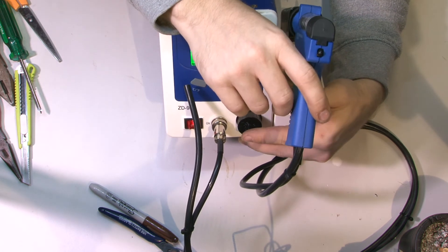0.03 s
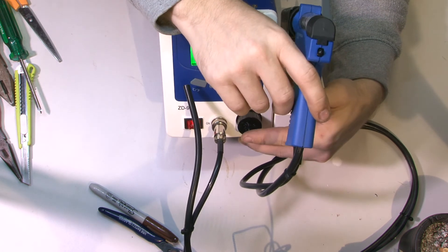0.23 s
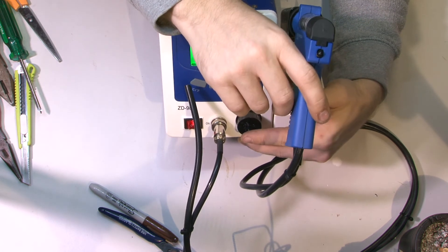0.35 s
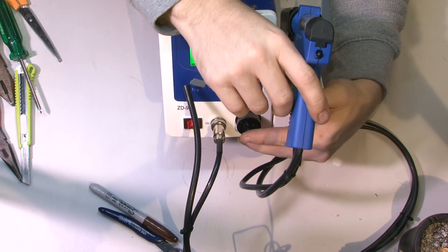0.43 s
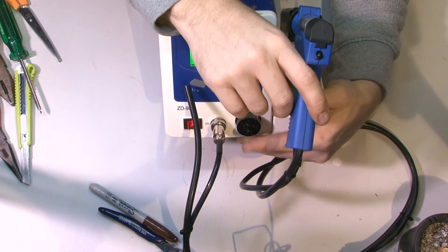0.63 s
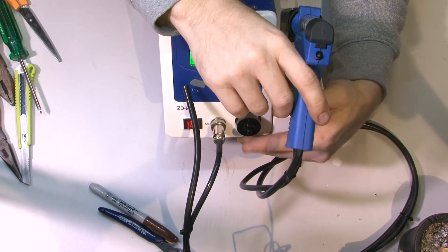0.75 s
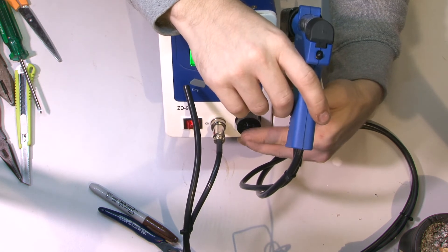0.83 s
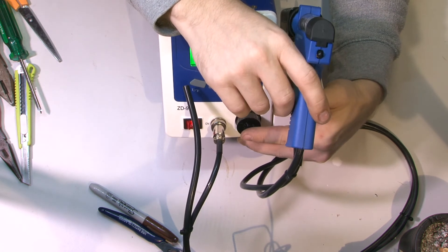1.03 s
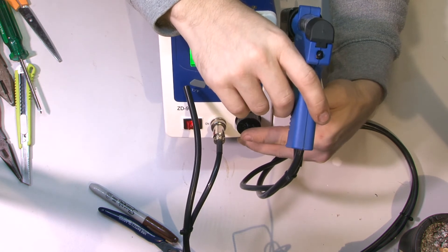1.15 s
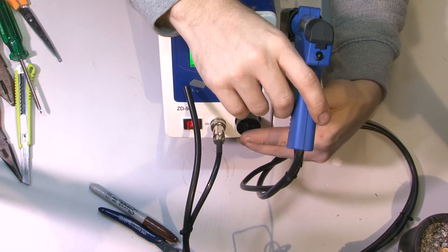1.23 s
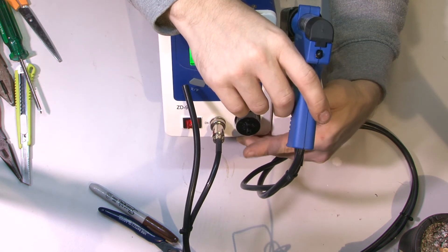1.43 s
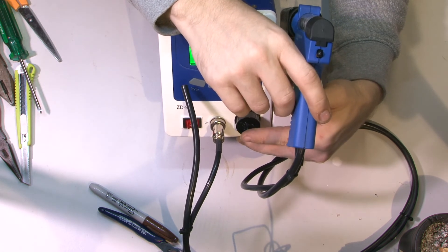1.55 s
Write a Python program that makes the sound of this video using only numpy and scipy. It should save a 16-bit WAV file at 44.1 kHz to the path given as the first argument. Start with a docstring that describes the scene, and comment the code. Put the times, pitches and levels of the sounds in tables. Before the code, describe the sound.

A small vacuum pump buzzes twice at a workbench. Each time, a desoldering gun's trigger clicks, the pump whirs up with a rattle and puffing air, then knocks to a stop. A small room hums faintly behind.

```python
"""The trigger of a desoldering gun clicks on, and a small vacuum pump in the bench unit spins up.
Its case hums at harmonics of the shaft; each turn thuds in the housing, rattles the panels, slaps a
valve and puffs air. The trigger clicks off, the pump coasts down, and the piston rocks to a stop with
a few knocks as the trigger clicks home. Then a second pull runs the same course.
Throughout, a small workroom reverberates and drones underneath."""
import sys
import numpy as np
from scipy import signal
from scipy.fft import rfft, irfft, next_fast_len
from scipy.io import wavfile
from scipy.ndimage import map_coordinates

SR = 44100
rng = np.random.default_rng(int(sys.argv[2]) if len(sys.argv) > 2 else 0)


def generate_wav(signal):
    """Clip the signal to [-1, 1] and save it as 16-bit WAV at the path in sys.argv[1]."""
    frames = np.transpose(np.atleast_2d(signal))
    scaled = np.clip(frames, -1, 1) * 32767
    pcm = np.round(scaled).astype(np.int16)
    wavfile.write(sys.argv[1], SR, pcm)


N = 70560
T = np.arange(N) / SR
TAIL = np.arange(SR // 3) / SR  # time axis of one decay


# shaft speed, one list per run (time [s], speed [turns/s])
RUN_SPEEDS = [
    [(.229, 39), (.25, 54.8), (.28, 70.3), (.31, 81.2), (.34, 86), (.38, 85.3), (.41, 83), (.45, 56),
     (.5, 27)],
    [(1.0425, 42), (1.06, 52.4), (1.088, 64.4), (1.112, 72), (1.146, 75.6), (1.165, 84), (1.2, 65.4),
     (1.236, 39.8), (1.27, 34)],
]
# envelopes, one list per run (time [s], hum [dB], thuds [dB], rattle [dB], valve [dB], air [dB])
RUN_ENVELOPES = [
    [(0.225, -12.5, -24.5, -20, -23, -41.5), (0.253, -8.5, -9, -13.5, -13.5, -29),
     (0.279, -10, -14, -19.5, -21.5, -32.5), (0.335, -12.5, -23, -21, -27.5, -42),
     (0.383, -9, -11, -19.5, -23.5, -28.5), (0.419, -23.5, -13, -33, -28.5, -37.5),
     (0.475, -31, -18, -26, -35.5, -57), (0.489, -40, -22, -43, -33, -56), (0.5, -37, -20, -35, -33, -55)],
    [(1.04, -3, -12, -17.5, -20.5, -43), (1.068, -9.5, -9.5, -18, -16, -28.5),
     (1.11, -9.5, -11, -22.5, -28, -37), (1.138, -12.5, -27, -24.5, -25.5, -43),
     (1.154, -17, -23, -20, -25, -35.5), (1.234, -26, -13.5, -35, -44.5, -56),
     (1.244, -22, -20, -35, -38, -66), (1.266, -21, -17, -35, -52, -64), (1.27, -18, -14, -23, -37, -59)],
]
def pump(speeds, envelopes):
    """Periodic forcing: one shaft drives every sound of a run, so pitch and stroke rate move together."""
    times, rates = np.transpose(speeds)
    start, stop = times[0], times[-1]
    speed = np.interp(T, times, rates)
    turns = np.cumsum(speed * (T > start)) / SR
    running = np.interp(T, [start - .003, start + .0016, stop - .01, stop + .0088], [0, 1, 1, 0])
    when, *columns = np.transpose(envelopes)
    hum_gain, thud_gain, rattle_gain, valve_gain, air_gain = [amp(np.interp(T, when, c)) for c in columns]

    def strokes(part, turn_share, gain):
        """Impulse excitation: one slightly uneven blow a turn, at the given share of the turn."""
        due = (np.diff(np.ceil(turns - turn_share), prepend=0) > 0) * (T < stop - .025)
        blows = due * amp(1.1 * rng.standard_normal(N))
        rms = np.sqrt(np.sum(part(blows) ** 2) / running.sum())
        return part(blows * gain) / rms

    hum = amp(-2.5) * np.sqrt(2) * hum_gain * case_hum(speed, turns, start)
    hiss = amp(1) * air_gain * air(speed, turns)
    thuds = strokes(housing, .5, thud_gain)
    rattle = amp(-.5) * strokes(panels, .08, rattle_gain)
    slaps = amp(-1) * strokes(valve, 0, valve_gain)
    return running * (hum + hiss) + thuds + rattle + slaps


# shaft harmonics, from the first upward (level [dB])
HARMONICS = [-9, -1, -7.5, -8, -9, -10.5, -12, -14.5]
# radiation of the case (frequency [Hz], gain [dB])
CASE_RESPONSE = [(40, -25), (62, 2), (75, -5.5), (90, -14), (115, -3.5), (150, 2.5), (185, -1.5), (220, -3),
                 (278, 1), (320, -9.5), (372, -2.5), (420, -8), (470, -1.5), (560, -16), (650, -7),
                 (900, -14)]
def case_hum(speed, turns, start, swell_s=0.015):
    """Forced vibration: harmonics of the shaft sweep through the resonances of the case."""
    hum = sum(amp(db + along(CASE_RESPONSE, k * speed)) * np.sin(2 * np.pi * k * turns)
              for k, db in enumerate(HARMONICS, 1))
    return hum * (1 - np.exp(-np.maximum(T - start, 0) / swell_s))


# rushing air (frequency [Hz], level [dB])
AIR_SPECTRUM = [(1500, -48), (2500, -4.5), (3500, -5.5), (4000, -6.5), (4800, -12.5), (7000, -14),
                (8400, -14.5), (9200, -22), (12000, -31), (16000, -36)]
# the rush over one turn (phase [turns], level [dB])
PUFF_SHAPE = [(0, 3), (.06, 4), (.25, 1.5), (.7, -1.5), (1, 2)]
def air(speed, turns, tick_t60=0.011, full_tick_hz=55):
    """Amplitude modulation: the hiss pulses once a turn, with a dry tick that weakens at low speed."""
    phase = turns % 1
    tick_decay = amp(-.5 - 60 * phase / speed / tick_t60)
    ticks = noise(SNAP_SPECTRUM) * tick_decay * np.minimum(speed / full_tick_hz, 1) ** 2
    puff = amp(np.interp(phase, *np.transpose(PUFF_SHAPE)))
    return ticks + unit(noise(AIR_SPECTRUM) * puff)


# resonances of the housing (frequency [Hz], level [dB], t60 [s])
HOUSING_MODES = [(60, -30, 0.18), (147.7, -12, 0.67), (222, -14, 0.028), (272.9, -8, 0.116),
                 (372.4, -4.5, 0.16), (386, 0.5, 0.027), (473, -6, 0.044), (671, -17, 0.069),
                 (847, -20.5, 0.053), (1047, -17.5, 0.11)]
def housing(blows):
    """Impact excitation: the piston thuds into the low modes of the housing."""
    return struck(blows, HOUSING_MODES, attack_s=.001, grit_db=-6.5, grit_t60=.05, band_hz=(177.3, 1600))


# resonances of loose sheet metal (frequency [Hz], level [dB], t60 [s])
PANEL_MODES = [(653, 0.5, 0.049), (851.7, 0, 0.13), (929, -2, 0.07), (1048.4, -1.5, 0.11),
               (1240, -11, 0.032), (1325, -2.5, 0.073), (1432, -6, 0.065)]
def panels(blows):
    """Plate vibration: the shaken panels rattle in their midrange modes."""
    return struck(blows, PANEL_MODES, attack_s=.0023, grit_db=2, grit_t60=.037, band_hz=(604, 1660))


# resonances of the valve (frequency [Hz], level [dB], t60 [s])
VALVE_MODES = [(1772, -10, 0.053), (1901, -8, 0.047), (1959, -8, 0.04), (2105, -13, 0.018),
               (2218, 1.5, 0.039), (2319, -9, 0.047), (2384, -7.5, 0.028)]
def valve(blows):
    """Damped free vibration: the valve flaps shut and its high modes die quickly."""
    return struck(blows, VALVE_MODES, attack_s=.0085, grit_db=-11.5, grit_t60=.042, band_hz=(1500, 3040))


# clatter of a struck part (frequency [Hz], level [dB])
CLATTER_SPECTRUM = [(180, 3.5), (280, -4.5), (370, -11.5), (580, -20), (1050, -24), (1390, -24.5),
                    (1540, -34), (1900, -24.5), (2210, -20.5), (2640, -44), (3200, -27)]
def struck(blows, modes, attack_s, grit_db, grit_t60, band_hz):
    """Convolution: each blow starts the ring of a part and a short burst of gritty clatter."""
    ringing = signal.fftconvolve(blows, ring(modes, attack_s))[:N]
    grit = noise(CLATTER_SPECTRUM, band_hz=band_hz)
    return ringing + amp(grit_db) * bursts(blows, grit_t60, attack_s=.00079) * grit


# the piston rocks against its dead point (time [s], level [dB])
PISTON_KNOCKS = [(.506, -9.5), (.543, -7.5), (.585, -11.5), (.628, -5), (1.204, -9.5), (1.259, -9.5),
                 (1.297, -4.5), (1.363, -18.5), (1.4, -35)]
# resonances of the pump on its mounts (frequency [Hz], level [dB], t60 [s])
MOUNT_MODES = [(65, -12, 0.47), (146.5, -22.5, 0.65), (324.6, -7, 0.076), (372, -15, 0.13),
               (384.5, 7, 0.039), (465, -11.5, 0.047), (623, -17.5, 0.068), (867, -14, 0.078),
               (1020, -16, 0.079), (1416, -19.5, 0.04)]
# last slaps of the valve (time [s], level [dB])
LAST_SLAPS = [(.485, -19.5), (.521, -19.5), (.558, -19), (1.239, -19), (1.274, -17)]
def rocking():
    """Oscillation about rest: the stopping piston flaps the valve and rocks the pump on its mounts."""
    knocks = struck(train(PISTON_KNOCKS), MOUNT_MODES,
                    attack_s=.0037, grit_db=-17, grit_t60=.13, band_hz=(200, 1510))
    slaps = train(LAST_SLAPS)
    puffs = noise(AIR_SPECTRUM, band_hz=(0, 8600)) * bursts(slaps, t60=.055, attack_s=.0028)
    return knocks + amp(6.5) * valve(slaps) + amp(-6.5) * panels(slaps) + amp(-17.5) * puffs


# on, off and home, twice (time [s], level [dB], relative ring [dB], relative scrape [dB], tilt [dB/oct])
TRIGGER_CLICKS = [(0.2063, -15, 2, -50, -3), (0.3776, -19.5, -4, -10, -2.5), (.6, -18.5, -10.5, -5.5, .5),
                  (1.0198, -14.5, 3, -53, -3), (1.157, -19, -6, -20, -3), (1.2862, -19.5, -10, -8, 3)]
# resonances of the plastic gun (frequency [Hz], level [dB], t60 [s])
GUN_MODES = [(370, -12, 0.27), (970, -2, 0.052), (1227, -0.5, 0.039), (2500, -25, 0.015),
             (3410, -11, 0.032), (4500, -8, 0.019), (4850, -2, 0.024), (6440, -5, 0.017),
             (8520, -2.5, 0.021)]
# a dry snap, also the tick of the pump (frequency [Hz], level [dB])
SNAP_SPECTRUM = [(500, -12.5), (1500, -0.5), (3200, -2), (5500, -3.5), (7500, 1), (10000, -2.5),
                 (13000, -3), (16000, -17)]
def trigger():
    """Transient excitation: a short scrape swells into a broadband snap that rings the plastic gun."""
    out = np.zeros(N)
    for s, db, ring_db, scrape_db, tilt in TRIGGER_CLICKS:
        colour = [(hz, level + tilt * np.log2(hz)) for hz, level in SNAP_SPECTRUM]
        snap = noise(colour, size=len(TAIL)) * (fade(.02) + amp(-25.5) * fade(.12))
        body = amp(ring_db - 1.5) * ring(GUN_MODES, attack_s=.0017)
        add(out, s, amp(db) * (snap + body))
        scrape_gain = amp(db + scrape_db - 60 * abs(T - s) / .014) * (T < s)
        out += scrape_gain * noise(colour)
    return out


# reverberation time of the workroom (frequency [Hz], t60 [s])
ROOM_DECAY = [(60, 1), (150, 0.85), (400, 0.46), (1000, 0.42), (3000, 0.27), (12000, 0.062)]
def room(x, delay_s=.005):
    """Reverberation: a diffuse tail decays exponentially, slowest in the bass."""
    hz, t, spectra = signal.stft(rng.standard_normal(SR), SR, nperseg=256)
    t60 = along(ROOM_DECAY, hz)[:, None]
    decaying = spectra * amp(-60 * t / t60) / np.sqrt(t60 / t60[-1])
    tail = signal.istft(decaying, SR, nperseg=256)[1]
    delayed = np.pad(x, (round(delay_s * SR), 0))
    return signal.fftconvolve(delayed, tail / np.linalg.norm(tail))[:N]


# tones of the room (frequency [Hz], level [dB], waver [dB])
DRONE_TONES = [(60, -41.5, 10), (150.3, -65, -17), (763, -52, 4.5)]
# rumble and hiss of the room (frequency [Hz], level [dB])
FLOOR_SPECTRUM = [(20, -29), (40, -1), (56, 6), (66, 7), (80, 0), (116, -11), (150, -11), (190, -25),
                  (250, -9), (400, -16.5), (500, -15), (600, -21.5), (780, -19), (950, -16.5), (1900, -28),
                  (3300, -32), (6000, -35), (16000, -47)]
def background():
    """Random modulation: a few tones waver in level and phase over a steady noise floor."""
    tones = sum(amp(db + waver_db * wobble(13.75)) * np.sin(2 * np.pi * hz * T + .37 * wobble(21))
                for hz, db, waver_db in DRONE_TONES)
    return amp(-35.5) * noise(FLOOR_SPECTRUM) + tones


def amp(db):
    """Decibels to gain."""
    return 10 ** (np.asarray(db) / 20)


def unit(x):
    """Normalisation to rms 1."""
    return x / np.sqrt(np.mean(x ** 2) + 1e-20)


def along(points, hz):
    """Interpolation on a log frequency axis."""
    f, v = np.transpose(points)
    return np.interp(np.log(hz + 1), np.log(f + 1), v)


def filtered(x, response):
    """Linear filtering: the spectrum times a frequency response."""
    m = next_fast_len(len(x) + 8192)
    return irfft(rfft(x, m) * response(np.fft.rfftfreq(m, 1 / SR)), m)[:len(x)]


def noise(spectrum, size=N, band_hz=(0, SR)):
    """Spectral shaping: coloured noise of rms 1."""
    low, high = band_hz
    white = rng.standard_normal(size)
    return unit(filtered(white, lambda f: amp(along(spectrum, f)) * (f >= low) * (f < high)))


def wobble(rate_hz):
    """Spline interpolation of random values."""
    return map_coordinates(rng.standard_normal(int(N * rate_hz / SR) + 4), [T * rate_hz], mode="nearest")


def fade(t60):
    """Exponential decay."""
    return amp(-60 * TAIL / t60)


def bursts(blows, t60, attack_s):
    """Superposition of one rising and decaying envelope per blow."""
    return signal.fftconvolve(blows, fade(t60) * (1 - np.exp(-TAIL / attack_s)))[:N]


def ring(modes, attack_s):
    """Modal superposition: damped sines with a soft start."""
    swell = 1 - np.exp(-TAIL / attack_s)
    return swell * sum(amp(db) * fade(t60) * np.sin(2 * np.pi * hz * TAIL) for hz, db, t60 in modes)


def train(events):
    """Impulse train from (time [s], level [dB]) rows."""
    s, db = np.transpose(events)
    return np.bincount(np.round(s * SR).astype(int), amp(db), N)[:N]


def add(out, s, x):
    """Superposition of x at time s."""
    i = max(0, round(s * SR))
    out[i:i + len(x)] += x[:max(0, N - i)]


def scene():
    """Superposition: direct sound of pump and trigger, its reverberation and the drone."""
    runs = sum(pump(speeds, envelopes) for speeds, envelopes in zip(RUN_SPEEDS, RUN_ENVELOPES))
    direct = runs + rocking() + trigger()
    return (direct + amp(-8.5) * room(direct) + background())[None]


def record(dry, top_hz=15900):
    """Soft saturation rounds the loudest peaks; a low-pass limits the band."""
    rounded = dry[0] / (1 + np.abs(dry[0] / 1.05) ** 6) ** (1 / 6)
    return filtered(rounded, lambda hz: hz < top_hz)[None]


dry = scene()
out = record(dry)
generate_wav(out)
```